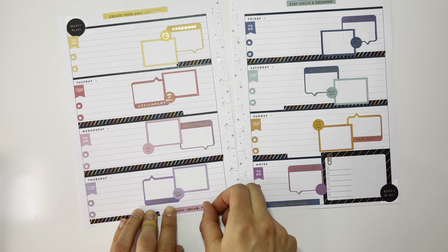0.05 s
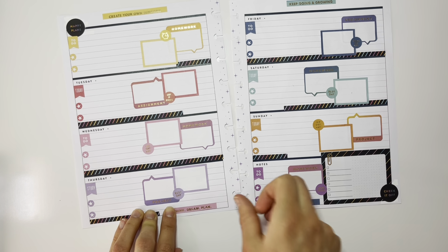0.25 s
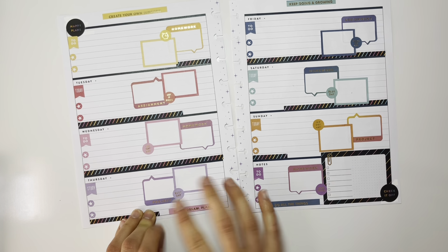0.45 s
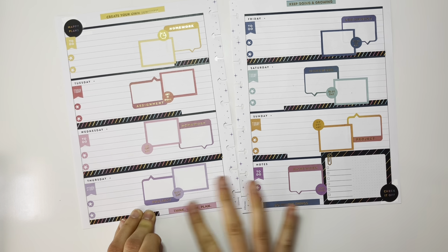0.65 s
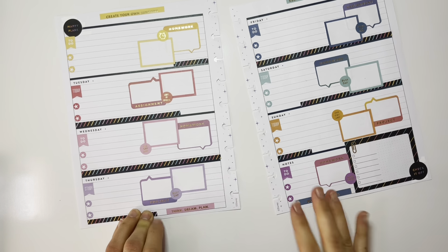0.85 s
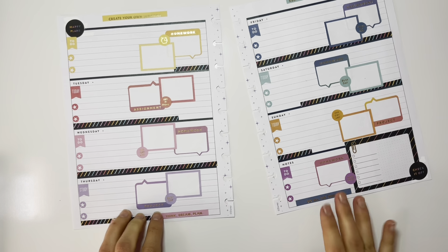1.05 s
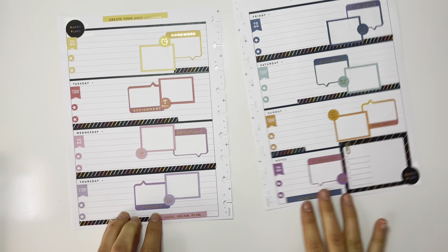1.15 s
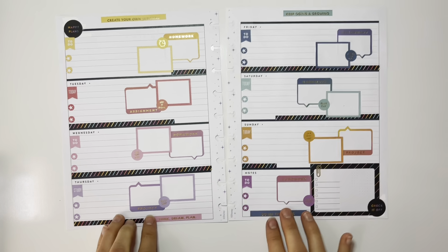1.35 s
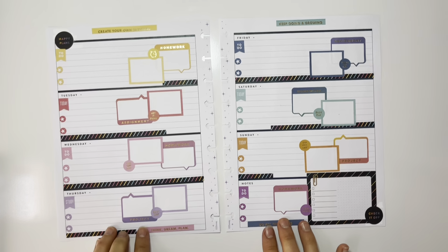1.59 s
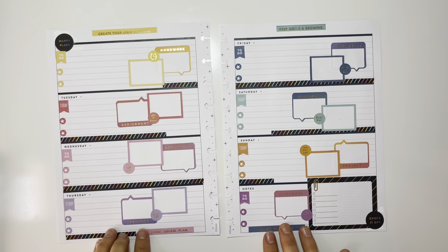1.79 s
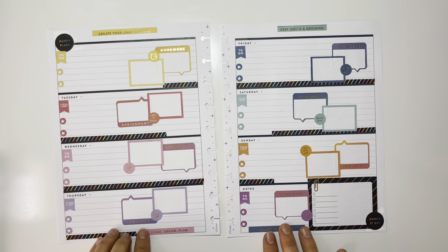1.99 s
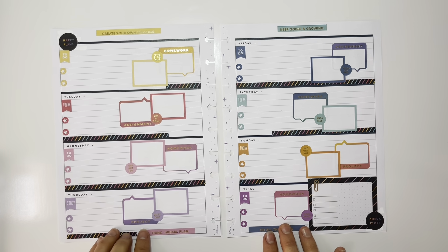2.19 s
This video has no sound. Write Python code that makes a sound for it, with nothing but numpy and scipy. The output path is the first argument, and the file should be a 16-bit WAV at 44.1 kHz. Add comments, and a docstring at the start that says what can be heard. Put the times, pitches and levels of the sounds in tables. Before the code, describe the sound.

Paper rustles close up: a sticker comes off a fingertip with a crisp snap and crackle, fingers rub it flat, then the page slides across a desk with light taps. A low hum fills the small room.

```python
"""Sticker on a planner page

Close up, a fingertip snaps off a paper sticker (noise bursts) and the page crackles down and rings.
Flat fingers rub the sticker smooth, tap the paper and slide the page over the desk: fibres catch and
let go as dense tiny clicks, and the hand thuds softly. A low hum and rumble fill the small room;
the hum swells towards the end."""
import sys
import numpy as np
from scipy import signal
from scipy.fft import rfft, irfft
from scipy.io import wavfile
from scipy.ndimage import uniform_filter1d

SR = 44100
rng = np.random.default_rng(int(sys.argv[2]) if len(sys.argv) > 2 else 0)


def log_audio(samples):
    """Write samples as a 16-bit WAV file to the path given in sys.argv[1]."""
    # one column per channel
    frames = np.atleast_2d(samples).T
    # limit to full scale, then quantise
    limited = np.clip(frames, -1, 1)
    pcm = np.round(limited * 32767).astype(np.int16)
    wavfile.write(sys.argv[1], SR, pcm)


N = 98519
FFT_SIZE = 110592
TIME_S = np.arange(N) / SR
BIN_HZ = np.maximum(np.arange(FFT_SIZE // 2 + 1) * SR / FFT_SIZE, 1)


def undb(db):
    """Decibels to gain."""
    return 10 ** (np.asarray(db) / 20)


def unit(x):
    """Scale to rms 1."""
    return x / np.sqrt(np.mean(x ** 2) + 1e-30)


def on_bins(points):
    """Interpolate (freq_hz, value) points over log frequency."""
    hz, value = np.array(points, float).T
    return np.interp(np.log(BIN_HZ), np.log(hz), value)


def shape(x, gain):
    """Filter by one gain per bin."""
    return irfft(rfft(x, FFT_SIZE) * gain)[..., :N]


def colour(x, points, tilt_db_per_oct=0):
    """Minimum-phase filter from (freq_hz, gain_db) points; keeps the power of white noise."""
    gain_db = on_bins(points) + tilt_db_per_oct * np.log2(np.minimum(BIN_HZ, SR / 8))
    cepstrum = irfft(np.log(unit(undb(gain_db))))
    cepstrum[1:FFT_SIZE // 2] *= 2
    cepstrum[FFT_SIZE // 2 + 1:] = 0
    return shape(x, np.exp(rfft(cepstrum)))


def wander(rate_hz):
    """Smooth random drift, rms near 1."""
    hold = int(SR / rate_hz)
    steps = np.repeat(rng.standard_normal(N // 100)[:N // hold + 1], hold)
    return unit(uniform_filter1d(uniform_filter1d(steps, hold), hold))[:N]


def burst(start_s, decay_s):
    """Noise with instant onset and exponential decay; rows: direct, diffuse."""
    age_s = TIME_S - start_s
    return rng.standard_normal((2, N)) * (age_s >= 0) * np.exp(-np.maximum(age_s, 0) / decay_s)


def background(rumble_db=-51, hiss_db=-74):
    """Steady rumble and faint hiss of the room."""
    # freq_hz, gain_db
    rumble_spectrum = [(20, -17.5), (30, -22.5), (40, 9), (50, -8.5), (62, 2), (85, -1), (105, -12),
                       (130, -7), (170, -17.5), (250, -26.5), (400, -45)]
    hiss_spectrum = [(100, -2.5), (300, 3.5), (500, -4), (1000, -12), (2000, -21.5), (4000, -27),
                     (8000, -26), (11500, -23.5), (13300, -47)]
    rumble = colour(rng.standard_normal((2, N)), rumble_spectrum + [(2000, -100)])
    hiss = colour(rng.standard_normal((2, N)), hiss_spectrum)
    return unit(rumble) * undb(rumble_db) + unit(hiss) * undb(hiss_db)


def hum(pitch_drift=0.01325, waver_db=2.7):
    """Low hum of three wavering harmonics; swells near the end."""
    # time_s, pitch_hz
    pitch_curve = [(0, 41.5), (0.6, 42.5), (1.3, 41.5), (1.7, 43.5), (2.23, 44)]
    # time_s, level_db
    level_curve = [(0, -49.5), (0.08, -53), (0.7, -56.5), (1.0, -52.5), (1.3, -60), (1.65, -52.5),
                   (1.85, -45), (1.97, -41), (2.08, -46.5), (2.23, -40)]
    # order, gain_db
    harmonics = [(1, -28.5), (2, -1.5), (3, -13.5)]
    pitch_hz = np.interp(TIME_S, *np.array(pitch_curve).T) * (1 + pitch_drift * wander(7.9))
    phase = 2 * np.pi * np.cumsum(pitch_hz) / SR
    tone = 0
    for order, gain_db in harmonics:
        amplitude = np.sqrt(2) * undb(gain_db + waver_db * wander(9.16))
        tone += amplitude * np.sin(order * phase + 2 * np.pi * rng.random())
    return tone * undb(np.interp(TIME_S, *np.array(level_curve).T))


def friction(strokes, spectrum, grain_spread_db, uneven_db, grains_per_s=9000):
    """Paper fibres catch and let go as dense tiny clicks; each stroke ramps up and eases off."""
    power = 0
    for start_s, length_s, level_db, attack_s, release_s in strokes:
        ramp = np.minimum((TIME_S - start_s) / attack_s, (start_s + length_s - TIME_S) / release_s)
        power += (undb(level_db) * np.clip(ramp, 0, 1)) ** 2
    force = np.sqrt(power) * undb(uneven_db * wander(70))
    grains = rng.standard_normal((2, N)) * (rng.random((2, N)) < grains_per_s / SR)
    grains *= undb(grain_spread_db * rng.exponential(size=(2, N)))
    return colour(unit(grains) * force, spectrum)


def rubbing():
    """Skin rubs and drags on paper; the page slides on the desk, squeals faintly, scrapes its edge."""
    # start_s, length_s, level_db, attack_s, release_s
    finger_rubs = [(0.08, 0.1, -74, 0.059, 0.0072), (0.155, 0.029, -56, 0.0061, 0.028),
                   (0.18, 0.06, -51, 0.026, 0.013), (0.29, 0.042, -80, 0.02, 0.022),
                   (0.346, 0.035, -67, 0.01, 0.0098), (0.48, 0.054, -78, 0.029, 0.033),
                   (0.576, 0.046, -66.5, 0.014, 0.039), (0.617, 0.23, -54, 0.05, 0.068),
                   (0.8, 0.037, -49.5, 0.023, 0.021), (0.83, 0.026, -61, 0.005, 0.04)]
    page_slides = [(0.91, 0.13, -75, 0.063, 0.04), (1.01, 0.09, -67.5, 0.035, 0.08),
                   (1.126, 0.58, -66.5, 0.0028, 0.039), (1.17, 0.23, -60, 0.13, 0.072),
                   (1.77, 0.084, -82, 0.03, 0.03), (1.87, 0.073, -83.5, 0.02, 0.04),
                   (2.06, 0.089, -82, 0.017, 0.043)]
    page_squeals = [(0.93, 0.161, -81, 0.093, 0.024)]
    edge_scrapes = [(0.183, 0.064, -60, 0.0062, 0.02), (0.622, 0.049, -76, 0.0043, 0.033),
                    (0.775, 0.07, -66.5, 0.042, 0.037), (1.128, 0.263, -77, 0.016, 0.03)]
    fingertip_drags = [(0.22, 0.47, -69, 0.013, 0.48)]
    # freq_hz, gain_db
    rub_spectrum = [(290, -56), (500, -17), (760, -18.5), (1150, -22), (1400, -31), (2700, -22.5),
                    (3600, -26), (6000, -15), (8200, -3.5), (9200, -5.5), (10900, 0), (12500, -15.5),
                    (13600, -44), (15500, -28), (17000, -56)]
    slide_spectrum = [(1470, -42), (2500, -25), (4500, -23.5), (5200, -12), (7300, -8), (8600, -3.5),
                      (9400, -1.5), (10900, 2), (12000, -10), (13200, -38.5), (15500, -34), (17000, -54)]
    squeal_spectrum = [(3000, -50), (4900, -20), (5300, 0.5), (5800, -12), (8000, -37)]
    scrape_spectrum = [(500, -10.5), (1400, 1.5), (2600, -3), (4500, 0.5), (8000, -1.5), (14000, -27)]
    drag_spectrum = [(200, -5.5), (420, 7), (750, -20), (1400, -31.5), (1950, -5.5), (2500, -30),
                     (5000, -38.5)]
    return (friction(finger_rubs, rub_spectrum, grain_spread_db=0.0, uneven_db=1.7)
            + friction(page_slides, slide_spectrum, grain_spread_db=-3.5, uneven_db=1.63)
            + friction(page_squeals, squeal_spectrum, grain_spread_db=-0.5, uneven_db=1.5)
            + friction(edge_scrapes, scrape_spectrum, grain_spread_db=1.5, uneven_db=1.1)
            + friction(fingertip_drags, drag_spectrum, grain_spread_db=0.5, uneven_db=-1.0))


def sticker_snaps(decay_s=0.0045):
    """Sharp bright snaps as the sticker's edge lets go."""
    # start_s, level_db
    snaps = [(0.153, -36.5), (0.1568, -42), (0.2045, -53), (0.351, -64), (0.574, -62.5), (1.1279, -57)]
    # freq_hz, gain_db
    snap_spectrum = [(180, -47), (300, -4.5), (1100, -10.5), (2500, -10), (3700, -18), (8600, -3.5),
                     (11000, 3), (12500, -10.5), (13600, -30), (15500, -23), (17000, -38)]
    bursts = sum(undb(level_db) * burst(start_s, decay_s) for start_s, level_db in snaps)
    return colour(bursts, snap_spectrum)


def desk_thuds(pitch_hz=70.6, rise_s=0.011):
    """The soft weight of the hand rocks the desk for a few low cycles."""
    # start_s, level_db
    thuds = [(0.172, -38), (1.162, -40), (1.636, -45.5)]
    rocking = 0
    for start_s, level_db in thuds:
        age_s = np.maximum(TIME_S - start_s, 0)
        envelope = age_s / rise_s * np.exp(1 - age_s / rise_s)
        rocking += undb(level_db) * envelope * np.sin(2 * np.pi * pitch_hz * age_s)
    return rocking


def page_taps_and_crackle(tap_decay_s=0.007, ring_db=-3.5):
    """Fingertips and page land and the paper buckles; both briefly ring the page and desk."""
    # start_s, level_db, tilt_db_per_oct
    taps = [(0.186, -44, 1), (0.195, -48, -0.5), (0.212, -58.5, 6.5), (0.575, -64, -3), (0.776, -50.5, -6),
            (0.792, -61, -21), (1.145, -67, 4), (1.257, -66.5, 7.5), (1.357, -63.5, 3.5),
            (1.376, -71, -5.5)]
    # start_s, length_s, level_db, attack_s, release_s
    buckles = [(0.178, 0.0576, -51, 0.0054, 0.01)]
    # freq_hz, gain_db
    page_spectrum = [(80, -30.5), (150, -9), (435, 0), (670, -12), (1100, -4.5), (1450, -15), (2200, -16),
                     (6000, -36.5), (7800, -54.5)]
    # freq_hz, gain_db, t60_s
    modes = [(245, -12, .15), (376, -10, .15), (438, -2, .2), (530, -8, .12), (754, -6, .15),
             (933, -5, .15), (992, -5, .15), (1130, -6, .12), (1164, -4, .15), (1297, -9, .12),
             (2108, -10, .18), (2590, -12, .15)]
    hits = sum(colour(undb(level_db) * burst(start_s, tap_decay_s), page_spectrum, tilt)
               for start_s, level_db, tilt in taps)
    hits += friction(buckles, page_spectrum, grain_spread_db=3.5, uneven_db=1.0)
    age_s = TIME_S[None, :N // 4]
    ring = 0
    for freq_hz, gain_db, t60_s in modes:
        mode = np.sin(2 * np.pi * freq_hz * age_s) * np.exp(-np.log(1000) * age_s / t60_s)
        ring += undb(gain_db) * unit(signal.fftconvolve(hits, mode, axes=1)[:, :N])
    return hits + unit(ring) * hits.std() * undb(ring_db)


def room_reverb(near, t60_s=0.11, gap_s=0.005, gain_db=-8.5):
    """Small-room reflections: the direct sound convolved with decaying noise."""
    tail = rng.standard_normal((2, N)) * np.exp(-np.log(1000) * TIME_S / t60_s) * (TIME_S > gap_s)
    return undb(gain_db) * signal.fftconvolve(near[:1], unit(tail) / np.sqrt(N), axes=1)[:, :N]


def scene():
    """Desk sounds, room and hum reach two microphone ports slightly apart."""
    # freq_hz, gain_db
    diffuse_share = [(40, -28.5), (85, -24), (160, -5), (300, -9), (600, -4), (1200, -1.5), (2200, -6),
                     (4000, -5.5), (6500, -7.5), (9000, -22.5), (12000, -20)]
    # freq_hz, left_minus_right_db
    port_balance = [(40, -0.4), (90, -3.5), (160, -2.5), (500, -0.5), (1100, 1.5), (2000, 1.5), (4000, 2.5),
                    (7000, 2.5), (8800, 0.5), (12000, 0)]
    # freq_hz, left_lead_rad
    port_phase = [(1000, 0), (2000, 0), (3000, .8), (4000, .2), (5500, .7), (6600, .1), (7700, 1),
                  (8600, 0), (10250, -3.14), (12000, -6.2), (15000, -6.3)]
    near = sticker_snaps() + page_taps_and_crackle() + rubbing()
    direct, diffuse = near + room_reverb(near) + background()
    mid = direct + desk_thuds() + hum()
    side = shape(diffuse, undb(on_bins(diffuse_share)))
    left_gain = undb(on_bins(port_balance) / 2) * np.exp(0.5j * on_bins(port_phase))
    return shape(np.array([mid + side, mid - side]), np.array([left_gain, 1 / left_gain]))


def record(dry):
    """Steep elliptic low-pass."""
    cutoff_hz = 15800
    return signal.sosfilt(signal.ellip(8, 0.2, 70, cutoff_hz, fs=SR, output="sos"), dry)


dry = scene()
out = record(dry)
log_audio(out)
```